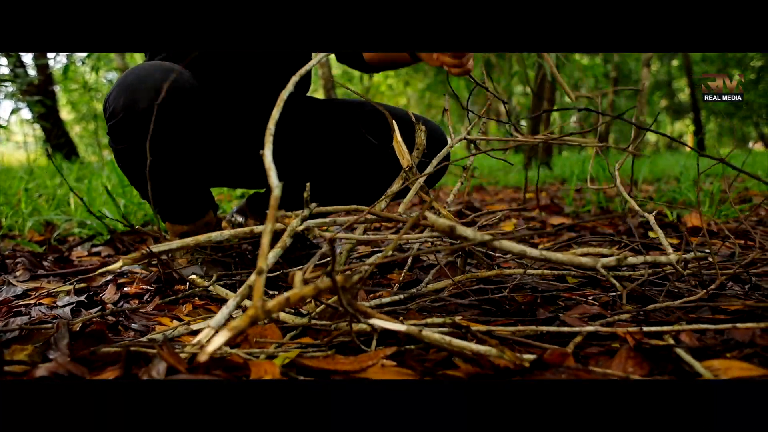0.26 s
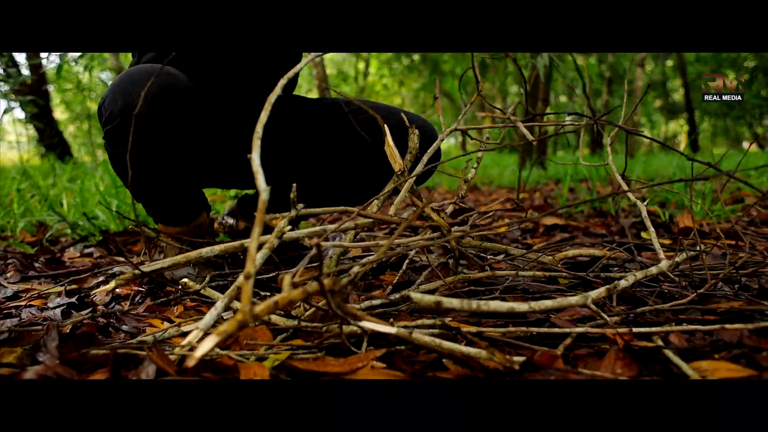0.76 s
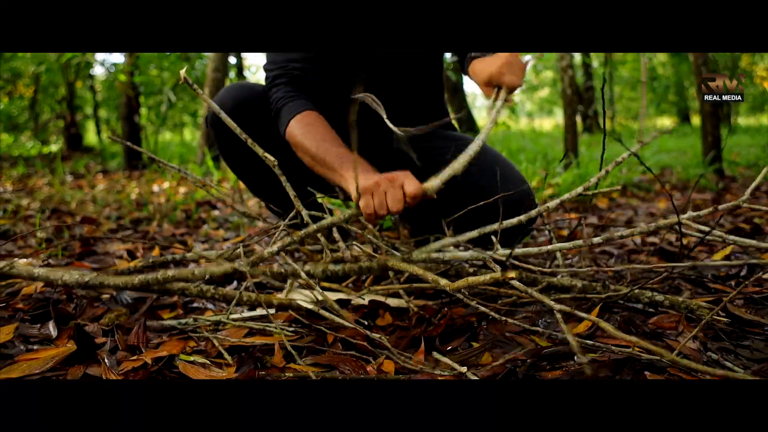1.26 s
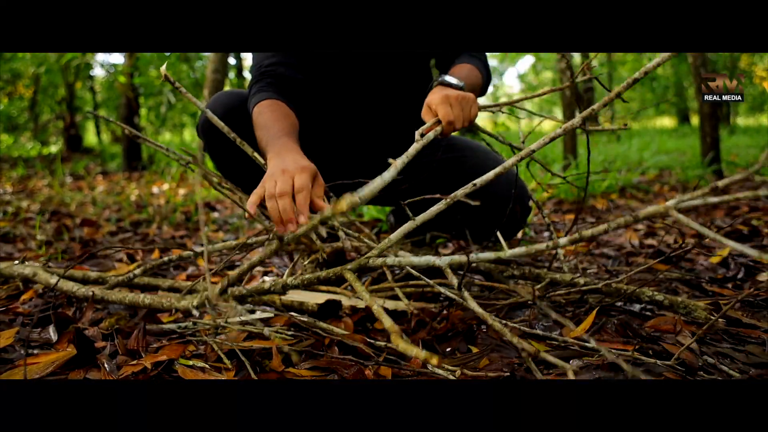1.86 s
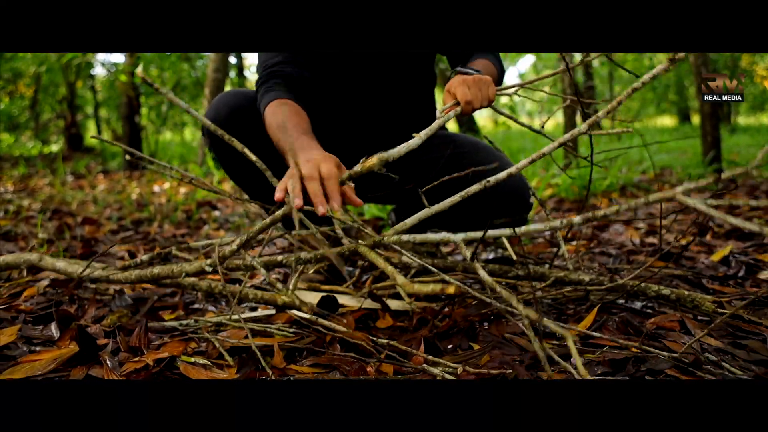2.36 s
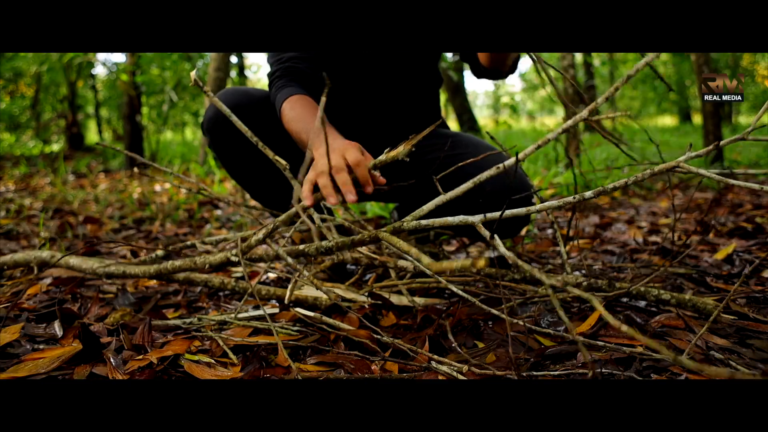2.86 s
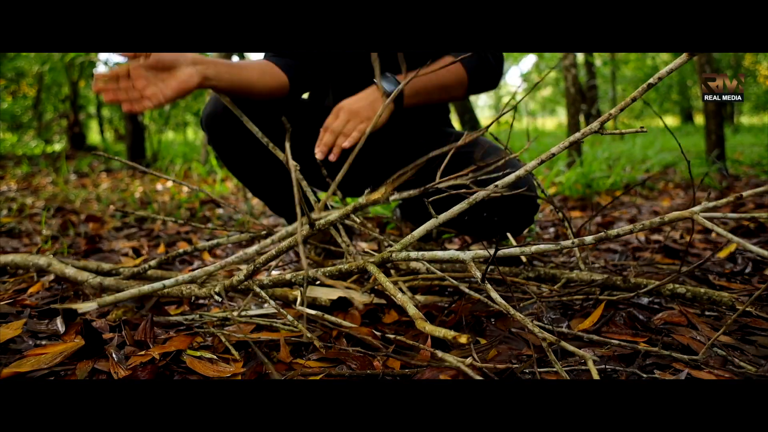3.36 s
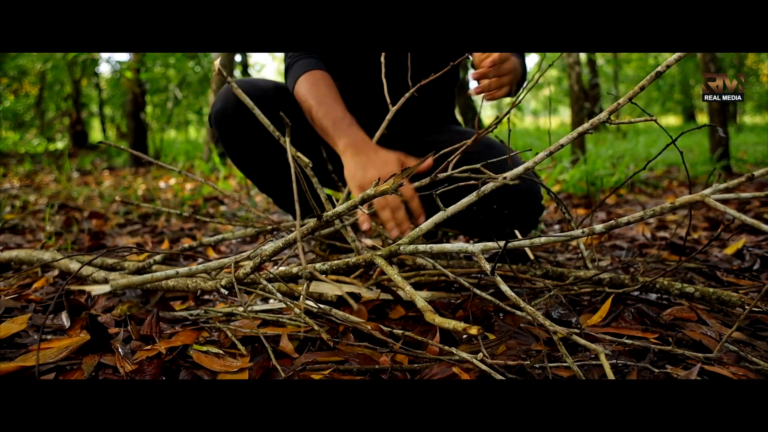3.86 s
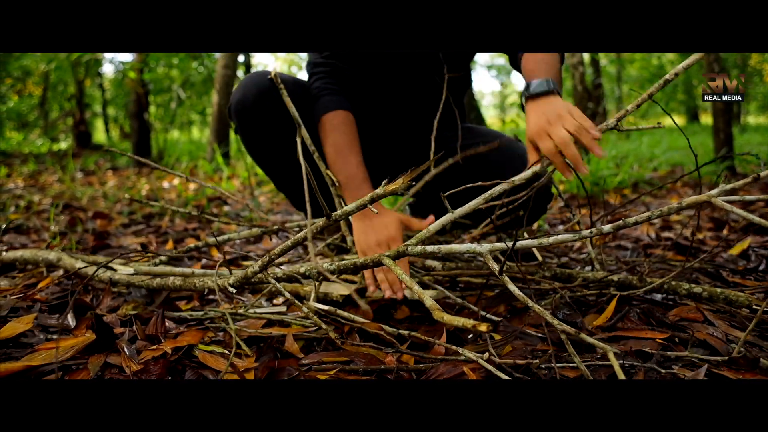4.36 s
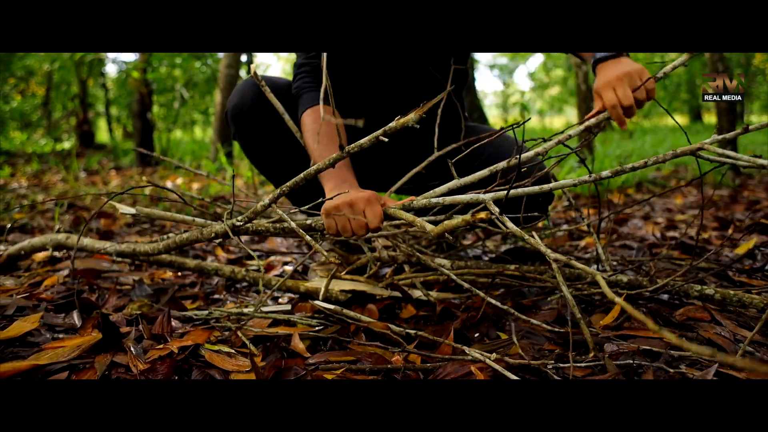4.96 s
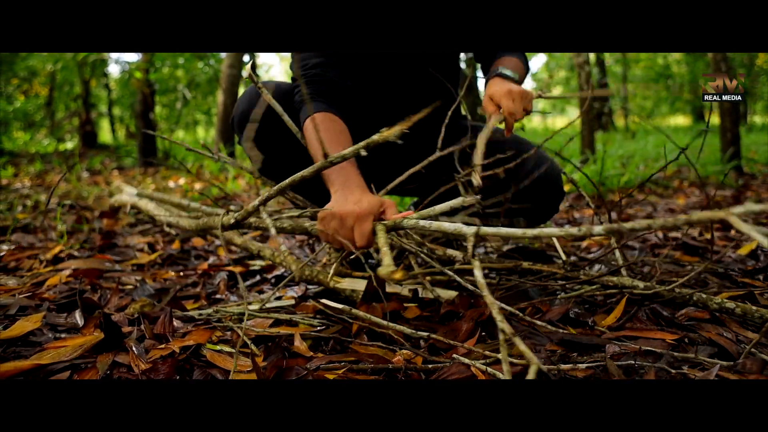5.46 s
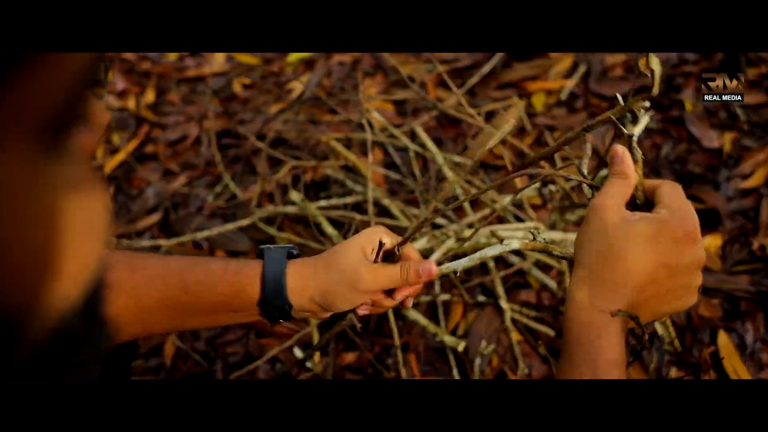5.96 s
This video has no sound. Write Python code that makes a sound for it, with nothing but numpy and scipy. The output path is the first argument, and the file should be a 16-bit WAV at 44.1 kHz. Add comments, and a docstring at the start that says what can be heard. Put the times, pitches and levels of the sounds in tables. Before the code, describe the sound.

Close stereo microphone in an open forest: brittle sticks break with hard, bright, slightly overloaded cracks, and twigs scrape, knock and clatter in a loose pile on dry leaves. Short sparse echoes come off the trunks. Behind it, shrill insects hiss continuously, a very faint low hum lingers, and a distant bird whistles upward roughly every half second to second. The background suddenly becomes quieter just before the final snap.

```python
"""In a forest, someone crouches to snap dry sticks and push them into a pile on dead leaves.
Each snap or knock is a short burst of noise that rings a stick; the pile is many tiny ringing grains.
Insects drone as narrow bands of noise, a bird repeats a rising sine whistle, something hums far off.
Loud cracks overload the recorder, which also turns down for a moment.
Near the end the level of insects, pile and hush suddenly drops, all at once; the hush drops least."""
import sys
import numpy as np
from scipy import signal
from scipy.fft import rfft, irfft
from scipy.io import wavfile
from scipy.ndimage import uniform_filter1d

SR = 44100
rng = np.random.default_rng(int(sys.argv[2]) if len(sys.argv) > 2 else 0)


def dump(signal):
    """Clip the signal to [-1, 1] and save it as 16-bit WAV at the path in sys.argv[1]."""
    limited = np.clip(np.atleast_2d(signal).T, -1, 1)
    pcm = np.round(limited * 32767).astype(np.int16)
    wavfile.write(sys.argv[1], SR, pcm)


N = 273846
TIME = np.arange(N) / SR  # seconds

# tone colour of the forest hush, per hertz: (frequency [Hz], relative level [dB])
AIR_COLOUR = [(20, -19), (60, -3), (140, 3), (250, -6), (600, -5.5), (1000, -0.5), (1400, 5.5), (2600, 5),
              (5000, -5.5), (9000, -13.5), (12000, -30), (16000, -4)]
# how alike left and right are for far sounds: (frequency [Hz], likeness [0-1])
FAR_LIKENESS = [(60, 0.95), (290, 1), (1400, 0.61), (3100, 0), (7000, 0)]
# how alike left and right are for near sounds: (frequency [Hz], likeness [0-1])
NEAR_LIKENESS = [(60, 1), (1500, 0.79), (3000, 0.06), (6000, 0.92), (14000, 0.1)]
# a faint low hum: (average frequency [Hz], middle level [dB])
HUM_TONES = [(142, -64), (176, -66.5)]
# insect choruses: (centre [Hz], width [Hz], relative level [dB], average throbs [per s], throb depth [0-1])
INSECT_CHORUSES = [(9370, 1200, -24.5, 47, 0.02), (6507, 520, -30.5, 28, 0.2), (6570, 1250, -34, 220, 0),
                   (4575, 700, -36, 30, 0.28)]
# near the end the level of insects and pile drops suddenly: when, how fast, how far
DROP_S, DROP_FADE_S, DROP_DB = 5.775, 0.02, -10.5

# a hand pushes or drags sticks: (start [s], length [s], twig clatter [relative dB], leaf crackle [relative dB])
PUSHES = [(0.07, 0.25, -35, -38), (0.525, 0.055, -39.5, -56), (1.04, 0.031, -46, -41.5),
          (1.335, 0.14, -37, -30), (1.503, 0.27, -26, -29.5), (1.847, 0.21, -30, -32.5),
          (2.15, 0.63, -35, -39.5), (2.588, 0.34, -29, -32.5), (3, 0.47, -29.5, -32.5),
          (3.405, 0.047, -29, -28.5), (3.536, 0.054, -35, -39), (4.064, 0.11, -37.5, -42.5),
          (4.14, 0.35, -28.5, -34), (4.616, 0.47, -41, -43.5), (5.347, 0.15, -31, -30.5),
          (5.559, 0.2, -30, -33.5)]
# every push swells just before its start, weakens while it lasts, then the pile settles
PUSH_RISE_S, PUSH_SAG_DB_PER_S, SETTLE_DB_PER_S = 0.047, 22, 163
JOLT_DB = -29.5  # a snap jolts the leaves, this far below its own table level
RESTLESS_DB = -45.5  # twigs never lie quite still under the hands
# tone colour of clattering twigs, per hertz: (frequency [Hz], relative level [dB])
TWIG_COLOUR = [(60, -40), (300, -17), (600, -13.5), (1200, -5), (2200, 3), (4000, 3), (6500, -4.5),
               (10000, -72), (15000, -37)]
# tone colour of crackling leaves, per hertz: (frequency [Hz], relative level [dB])
LEAF_COLOUR = [(300, -26), (1500, -6.5), (4000, 3), (7000, 1), (11000, -3), (15500, -6)]

# a stick breaks: (time [s], relative level [dB], tearing time [s], ring [Hz], low-tone body [relative dB])
SNAPS = [(0.067, -2, 0.0023, 2920, -23), (0.1161, -3.5, 0.0066, 7230, -20), (0.1286, -5, 0.022, 4420, -21),
         (0.161, -11, 0.002, 3280, -34), (0.1687, -10, 0.001, 1180, -8), (0.2105, -3, 0.0011, 6600, -27.5),
         (0.3628, -5.5, 0.003, 14040, -13), (1.2982, 2.5, 0.0055, 5740, -16),
         (1.5712, -8.5, 0.0091, 3280, -16), (2.5724, -8, 0.0078, 4100, -12.5),
         (2.591, -10.5, 0.026, 4080, -16), (2.611, -7, 0.0064, 4020, -17), (3.009, -7, 0.01, 4650, -13),
         (3.02, -10.5, 0.017, 2770, -4.5), (4.1314, -4.5, 0.0032, 2200, -10),
         (4.865, -5.5, 0.0027, 8040, -15.5), (5.21, 0.5, 0.0053, 7780, -9),
         (6.1183, -1.5, 0.00082, 7600, -14.5), (6.131, -13, 0.00052, 6700, -17)]
# a stick that tears for longer also takes longer to let go: usual tearing time, and the power of that growth
TYPICAL_TEAR_S, SPLIT_GROWTH = 0.0044, 0.34
# thin fibres ring higher and crack brighter: treble of a snap that rings at SNAP_HZ, and its rise per octave
SNAP_HZ, SNAP_TREBLE_DB, SNAP_DB_PER_OCTAVE = 6130, -5, 3.5
# twigs knock or scrape: (time [s], relative level [dB], ring [Hz], hardness of the contact [0-1])
KNOCKS = [(0.0903, -14, 4570, .9), (0.2248, -15, 5170, .5), (0.27, -22, 5380, 0.8),
          (0.2881, -11.5, 5800, 0.72), (0.333, -18.5, 2900, .25), (0.3833, -15.5, 4050, 0.2),
          (0.533, -25, 3900, .45), (1.2284, -18.5, 5770, 0.72), (1.3851, -8.5, 6400, 0.55),
          (1.5504, -8.5, 5170, 0.63), (1.5917, -13, 5900, .15), (1.638, -16, 4470, 0.28),
          (1.723, -18, 3430, 0.2), (1.9619, -15.5, 7560, 0.03), (2.0198, -15, 4300, 0.53),
          (2.127, -17, 3800, 0.74), (2.2896, -19.5, 4000, 0), (2.999, -12, 2720, 0.56),
          (3.276, -17.5, 4200, 0.57), (3.3882, -16.5, 6070, .45), (3.399, -15.5, 2370, .15),
          (3.4804, -12.5, 8100, .75), (3.5187, -13, 7110, .8), (4.233, -22.5, 1150, 0),
          (4.4565, -19.5, 4350, 0.18), (4.657, -21, 2920, 0.2), (4.957, -16.5, 8100, 0.6),
          (4.9653, -11.5, 3700, 0.48), (5.1925, -15.5, 6150, 0.5), (5.2275, -7.5, 8270, .7),
          (5.375, -12, 6200, 0.7), (5.434, -14.5, 2170, 0.03), (5.4859, -10.5, 5900, 0.73),
          (5.554, -15, 4800, 0.6), (5.5821, -13, 4380, .25), (5.6691, -12, 4320, 0.32),
          (5.934, -22, 3320, 0.37), (6.0137, -23.5, 4020, 0.62)]
# a harder contact is thinner, brighter and has a shorter scrape: (softest, hardest)
KNOCK_BODY_DB, KNOCK_TREBLE_DB, KNOCK_SCRAPE_T60_S = (-4.5, -35), (-21, 4.5), (0.15, 0.015)

# bird whistles: (time of the top [s], relative level [dB], start pitch [Hz], top pitch [Hz], rise [s])
WHISTLES = [(0.769, -21, 717, 1290, 0.0564), (1.012, -23, 743, 1265, .066), (1.538, -25.5, 738, 1288, .065),
            (2.181, -23.5, 719, 1300, 0.057), (2.672, -23.5, 736, 1260, 0.089),
            (3.193, -22, 722, 1311, .048), (3.702, -21.5, 736, 1328, .057), (4.585, -24, 741, 1245, .059),
            (5.925, -29.5, 1090, 1309, .08)]
WHISTLE_TAIL = 0.1  # share of the rise time that is added to the short sag after the top
EDGE_HZ = 15750  # nothing much is heard above this pitch


def amp(db):
    """Turns decibels into a gain."""
    return 10 ** (np.asarray(db) / 20)


def unit(x):
    """Scales a sound to an average strength (rms) of 1."""
    return x / np.sqrt(np.mean(x ** 2) + 1e-20)


def read(points, hz):
    """Reads a table between its points, on a log-frequency axis."""
    table_hz, value = np.transpose(points)
    return np.interp(np.log(hz + 1), np.log(table_hz + 1), value)


def add(mix, s, sound):
    """Mixes a stereo sound in at time s."""
    part = mix[:, max(round(s * SR), 0):][:, :sound.shape[1]]
    part += sound[:, :part.shape[1]]


def bins(size):
    """Lists the frequencies in a spectrum of this many samples."""
    return np.fft.rfftfreq(size, 1 / SR)


def pair(x, likeness):
    """Blends two unrelated channels until they are as alike as two microphones would hear."""
    spectrum = rfft(x)
    same = np.clip(read(likeness, bins(x.shape[1])), -1, 1)
    turn = np.arcsin(same) / 2
    blend = np.cos(turn) * spectrum + np.sin(turn) * spectrum[::-1]
    return irfft(blend, x.shape[1])


def colour(x, points, size=2048):
    """Gives a sound the table's tone colour without any sound before an attack, so attacks stay sharp."""
    # folding the cepstrum (the spectrum of the log spectrum) forward makes the filter minimum-phase
    cepstrum = irfft(np.log(amp(read(points, bins(size)))))
    cepstrum[1:size // 2] *= 2
    cepstrum[size // 2 + 1:] = 0
    taps = irfft(np.exp(rfft(cepstrum)))[:size // 2]
    return signal.oaconvolve(x, taps[None], axes=1)[:, :x.shape[1]]


def band_rms(x, lo_hz, hi_hz):
    """Finds the strength of one band of a full-length sound."""
    hz = bins(N)
    band = rfft(x.mean(0))[(hz > lo_hz) & (hz < hi_hz)]
    return np.sqrt(2 * np.sum(abs(band) ** 2)) / N


def drift(rate_hz):
    """Wanders slowly at random, with an rms of 1; a higher rate wanders faster."""
    spectrum = rfft(rng.standard_normal(N)) * np.exp(-(bins(N) / rate_hz) ** 2)
    return unit(irfft(spectrum, N))


def fade(t, t60):
    """Dies away steadily, by 60 dB in t60 seconds."""
    return amp(-60 * t / t60)


def jerks(size, spread_db):
    """Wood gives way unevenly, about a millisecond at a time."""
    uneven = unit(uniform_filter1d(rng.standard_normal(size), size=40))
    return amp(spread_db * uneven)


def after_drop():
    """Goes quickly from 0 to 1 at the sudden drop in level."""
    return np.clip((TIME - DROP_S) / DROP_FADE_S, 0, 1)


def air(level_db=-42, late_db=-3):
    """Far rumble and the soft hush of the forest: coloured noise that wanders in level."""
    noise = pair(rng.standard_normal((2, N)), FAR_LIKENESS)
    hush = unit(colour(noise, AIR_COLOUR))
    return hush * amp(level_db + 1.5 * drift(2.3) + late_db * after_drop())


def hum():
    """A distant hum: steady tones whose pitch and level waver."""
    out = np.zeros(N)
    for hz, db in HUM_TONES:
        level = amp(db + 2 * drift(11)) * np.sqrt(2)  # a sine with a peak of root 2 has an rms of 1
        out += level * np.sin(2 * np.pi * hz * TIME + drift(3.0))
    return out


def insects(level_db=0.33, waver_db=1.24):
    """Each chorus buzzes in one band of noise; some throb unevenly, others hold almost steady."""
    out, hz = np.zeros((2, N)), bins(N)
    for centre_hz, width_hz, db, throb_rate, depth in INSECT_CHORUSES:
        resonance = 1 / (1 + ((hz - centre_hz) / width_hz) ** 2) ** 2
        skirt = 1 / (1 + (hz / 10100) ** 40)  # a steep drop above 10.1 kHz
        buzz = unit(irfft(rfft(rng.standard_normal((2, N))) * resonance * skirt, N))
        uneven_rate = throb_rate * (1 + 0.267 * drift(22.6))
        throb = 1 + depth * np.sin(2 * np.pi * np.cumsum(uneven_rate) / SR)
        out += buzz * throb * amp(db + waver_db * drift(12.3))
    return out * amp(level_db + DROP_DB * after_drop()) * amp([[-.6], [.6]])  # a little louder on the right


def stir(start, length):
    """Gain of one disturbance of the pile: swell, slow sag, settling."""
    t = TIME - start
    swell = np.clip(1 + t / PUSH_RISE_S, 0, 1)
    sag_db = PUSH_SAG_DB_PER_S * np.clip(t, 0, length)
    settle_db = SETTLE_DB_PER_S * np.maximum(t - length, 0)
    return swell * amp(-sag_db - settle_db)


def agitation():
    """Gains of the twigs and of the leaves: pushes and jolts add up in power."""
    twigs, leaves = amp(RESTLESS_DB) ** 2, 0
    for start, length, twig_db, leaf_db in PUSHES:
        push = stir(start, length)
        twigs = twigs + (amp(twig_db) * push) ** 2
        leaves = leaves + (amp(leaf_db) * push) ** 2
    for s, db, *_ in SNAPS:
        jolt = stir(s, 0) * (TIME > s)
        leaves = leaves + (amp(db + JOLT_DB) * jolt) ** 2
    return np.sqrt([twigs, leaves]) * amp(DROP_DB * after_drop())


def grains(per_s, spread_db, lo_hz, hi_hz, ring_t60, tick_t60, tick_db, size=700):
    """Many small pieces, each with its own pitch and place, tick and ring at random moments."""
    out, t = np.zeros((2, N)), np.arange(size) / SR
    chance, pitch, force, place, phase = rng.random((5, N))
    ticks = rng.standard_normal((97, 2, size)) * fade(t, tick_t60)  # a stock of ticks to pick from
    ticks = amp(tick_db) * unit(ticks)
    decay = unit(fade(t, ring_t60))
    for i in np.flatnonzero(chance < per_s / SR):
        hz = lo_hz + pitch[i] * (hi_hz - lo_hz)
        ring = decay * np.sin(2 * np.pi * hz * t + [[0], [np.pi * phase[i]]])
        sides = np.sqrt([[place[i]], [1 - place[i]]])
        strength = amp(spread_db * min(-np.log(force[i]), 3))  # mostly weak, a few strong
        add(out, i / SR, strength * sides * (ring + ticks[i % len(ticks)]))
    return pair(out, NEAR_LIKENESS)


def rustle(twigs_db=0, leaves_db=0):
    """Twigs scrape and clatter in clumps while dead leaves crackle beneath them."""
    twig_gain, leaf_gain = agitation()
    twigs = grains(per_s=520, spread_db=4.7, lo_hz=900, hi_hz=6500,
                   ring_t60=.024, tick_t60=.012, tick_db=4)
    leaves = grains(per_s=1900, spread_db=3.0, lo_hz=3000, hi_hz=15000,
                    ring_t60=.004, tick_t60=.008, tick_db=4)
    twigs, leaves = colour(twigs, TWIG_COLOUR), colour(leaves, LEAF_COLOUR)
    # each layer is set to strength 1 in a band of its own
    twigs = twigs / band_rms(twigs, 1600, 3900)
    leaves = leaves / band_rms(leaves, 10800, 15300)
    clatter = twigs * twig_gain * amp(twigs_db)
    crackle = leaves * leaf_gain * amp(leaves_db)
    clumps = amp(1.2 * drift(30))
    return (clatter + crackle) * clumps * amp([[-1], [1]])


def wood(crack, shake, ring_hz, ring_db, body_db, treble_db, ring_width_hz, bass_db):
    """Tiny fractures ring the stick's strongest bending mode; bark and litter shake on after them."""
    fractures = pair(rng.standard_normal((2, len(crack))) * crack, NEAR_LIKENESS)
    litter = rng.standard_normal((2, len(crack))) * shake
    r = np.exp(-np.pi * ring_width_hz / SR)  # how much of the ring is left after one sample
    pole = r * np.exp(2j * np.pi * ring_hz / SR)
    ring = 2 * signal.lfilter([1 - r], [1, -pole], fractures).real
    shape = [(40, body_db + bass_db - 28), (300, body_db + bass_db), (1200, body_db),
             (2900, -0.53), (7500, 0.91), (12000, treble_db), (16000, treble_db - 3.5)]
    left, right = colour(fractures + litter + amp(ring_db) * ring, shape)
    lag = rng.integers(0, 6)  # samples: a small random delay between the two microphones, new for each event
    return np.array([np.roll(left, lag), right])


def snaps(ring_db=5, split_t60=0.025, shake_db=-23, shake_t60=0.11, level_db=0, size=8000):
    """Fibres tear in quick jerks, the stick lets go, and its halves shiver."""
    out, t = np.zeros((2, N)), np.arange(size) / SR
    for s, db, tear, ring_hz, body_db in SNAPS:
        treble_db = SNAP_TREBLE_DB + SNAP_DB_PER_OCTAVE * np.log2(ring_hz / SNAP_HZ)
        after = np.maximum(t - tear, 0)  # time since the tearing ended
        release_t60 = split_t60 * (tear / TYPICAL_TEAR_S) ** SPLIT_GROWTH
        crack = jerks(size, spread_db=2.0) * fade(after, release_t60)
        shake = jerks(size, spread_db=3) * amp(shake_db) * fade(after, shake_t60)
        snap = wood(crack, shake, ring_hz, ring_db, body_db, treble_db, ring_width_hz=320, bass_db=-6.5)
        head = round(max(tear, .01) * SR)  # the opening part sets the level
        add(out, s, amp(db + level_db) * snap / np.std(snap[:, :head]) * amp([[-.6], [.6]]))
    return out


def forest(x, t60, size=30000):
    """Sparse echoes from the trunks, thin in the bass, starting after 8 ms."""
    t = np.arange(size) / SR
    sparse = rng.standard_normal((2, size)) * (rng.random((2, size)) < .04)
    taps = sparse * fade(t, t60) * (t > .008)
    taps = colour(taps, [(100, -28), (1200, -4.5), (6000, 1.5), (15000, 1.0)])
    return signal.fftconvolve(x, taps / np.linalg.norm(taps[0]), axes=1)[:, :N]


def knocks(ring_db=5, scrape_db=-4, shake_db=-26, shake_t60=0.098, level_db=0.5, size=4000):
    """A tick and a short scrape set a twig ringing and shake those that touch it."""
    out, t = np.zeros((2, N)), np.arange(size) / SR
    for s, db, ring_hz, hardness in KNOCKS:
        body_db = np.interp(hardness, (0, 1), KNOCK_BODY_DB)
        treble_db = np.interp(hardness, (0, 1), KNOCK_TREBLE_DB)
        scrape_t60 = np.exp(np.interp(hardness, (0, 1), np.log(KNOCK_SCRAPE_T60_S)))
        tick = fade(t, t60=.012)
        scrape = amp(scrape_db) * jerks(size, spread_db=2) * fade(t, scrape_t60)
        shake = jerks(size, spread_db=5) * amp(shake_db) * fade(t, shake_t60)
        knock = wood(tick + scrape, shake, ring_hz, ring_db, body_db, treble_db,
                     ring_width_hz=560, bass_db=-19.5)
        head = SR // 100  # the first 10 ms set the level
        add(out, s, amp(db + level_db) * knock / np.std(knock[:, :head]) * amp([[-1], [1]]))
    return out


def bird(swell_db=16, level_db=0):
    """A nearly pure note that swells as it slides up, then sags a little."""
    out = np.zeros((2, N))
    for s, db, start_hz, top_hz, rise in WHISTLES:
        tail = WHISTLE_TAIL * rise + .013
        t = np.arange(-rise, tail, 1 / SR)  # 0 is the top of the whistle
        climb = np.cos(np.pi / 2 * np.minimum(t, t / 2) / rise) ** 2  # falls half as fast as it rose
        hz = start_hz + (top_hz - start_hz) * climb
        tone = np.sin(2 * np.pi * np.cumsum(hz) / SR)
        note = tone * amp(swell_db * (climb - 1)) * signal.windows.tukey(len(t), .3)
        add(out, s - rise, amp(db + level_db) * note * amp([[-1], [1]]))
    return out


def scene(calls_db=-4):
    """Sticks close by, bird and insects among the trees."""
    sticks, calls = snaps() + knocks(), bird()
    near = sticks + amp(-13.5) * forest(sticks, t60=0.15) + rustle()
    far = amp(calls_db) * calls + amp(-6) * forest(calls, t60=.6)
    return near + far + insects() + air() + hum()


def record(dry, ceiling=1.0, threshold_db=-5, recover_db_per_s=90):
    """A slow limiter ducks loud moments, cracks too quick for it hit a soft ceiling, then the treble is cut."""
    power = signal.lfilter(np.ones(400) / 400, 1, (dry ** 2).mean(0))  # average over about 9 ms
    over_db = np.maximum(10 * np.log10(abs(power) + 1e-12) - threshold_db, 0)
    fall = TIME * recover_db_per_s
    held_db = np.maximum.accumulate(over_db + fall) - fall  # jumps up, then recovers steadily
    duck_db = signal.lfilter([.002], [1, -.998], held_db)  # smoothing makes the limiter late
    ducked = dry / amp(duck_db)
    clipped = ducked / (1 + (ducked / ceiling) ** 8) ** (1 / 8)
    low_pass = signal.firwin(511, EDGE_HZ, window=("kaiser", 8), fs=SR)
    return signal.oaconvolve(clipped, low_pass[None], "same")


dry = scene()
out = record(dry)
dump(out)
```